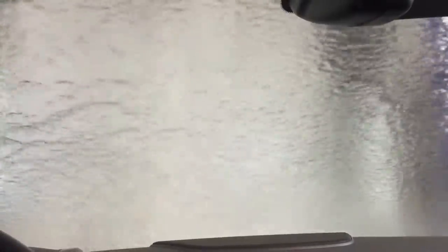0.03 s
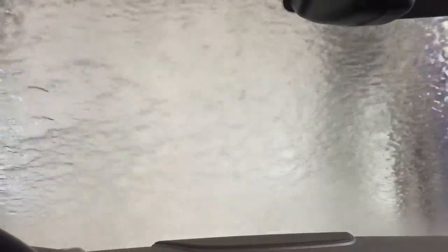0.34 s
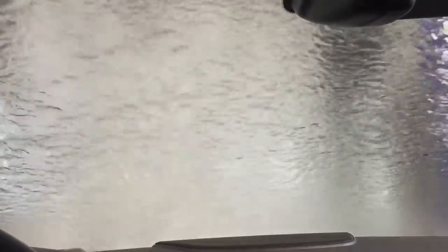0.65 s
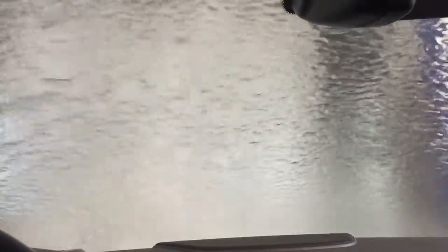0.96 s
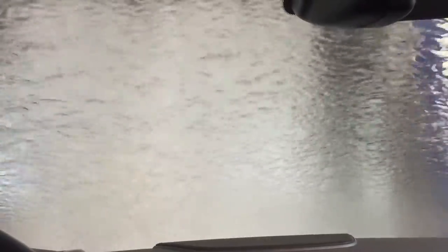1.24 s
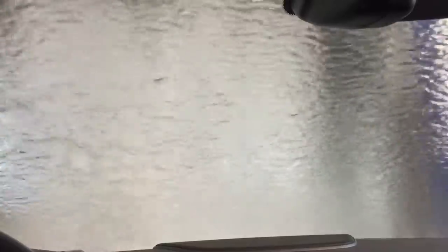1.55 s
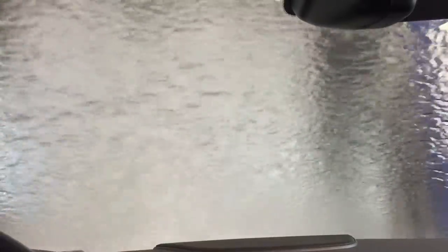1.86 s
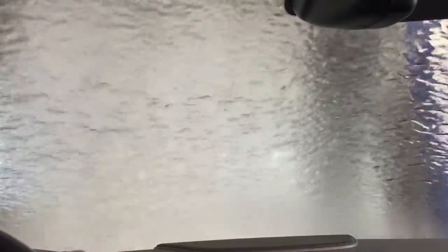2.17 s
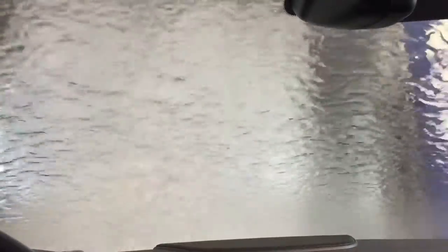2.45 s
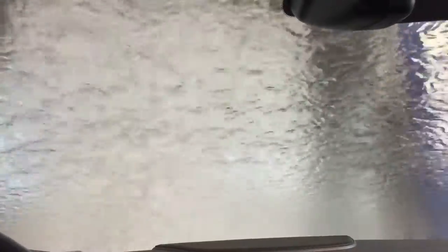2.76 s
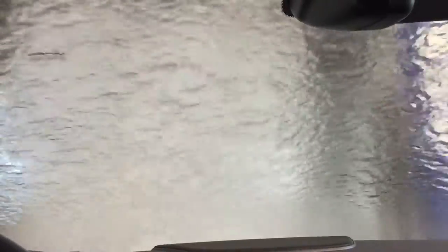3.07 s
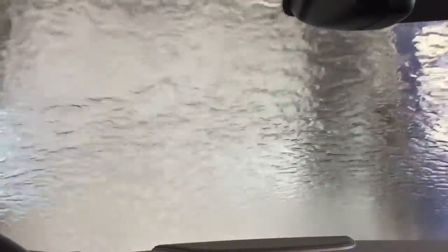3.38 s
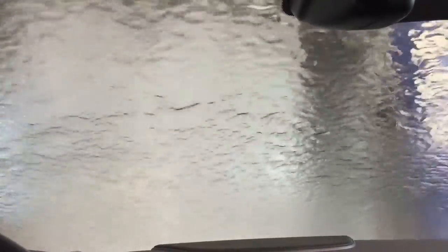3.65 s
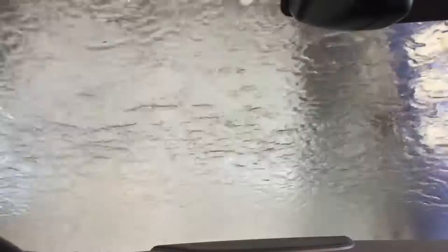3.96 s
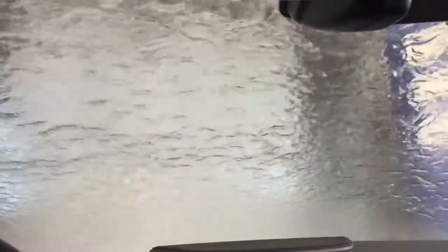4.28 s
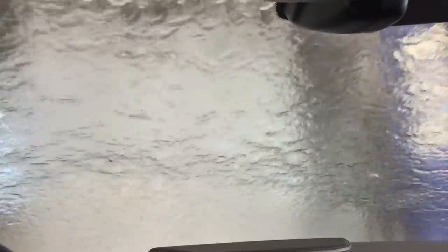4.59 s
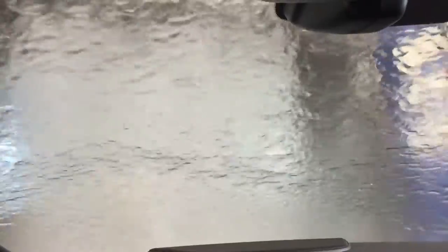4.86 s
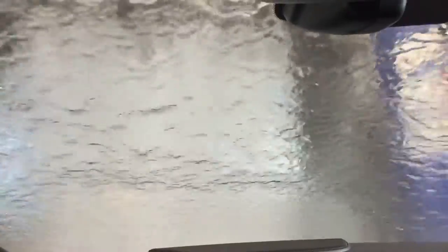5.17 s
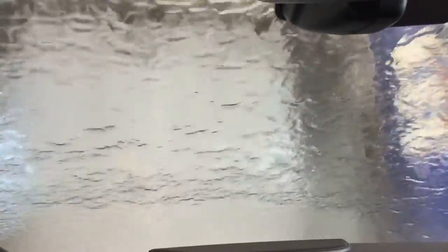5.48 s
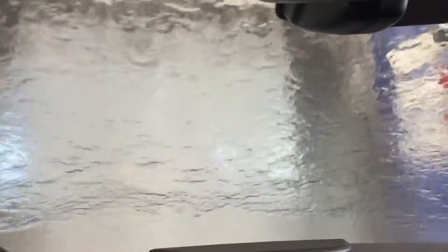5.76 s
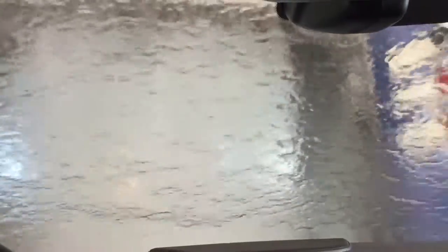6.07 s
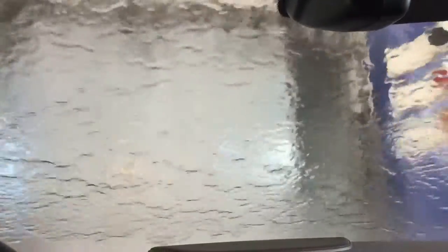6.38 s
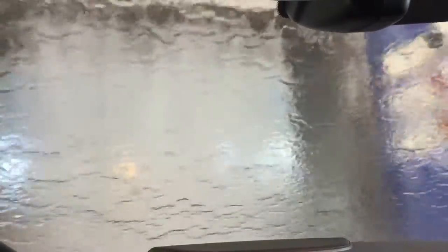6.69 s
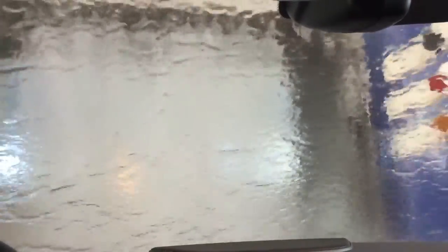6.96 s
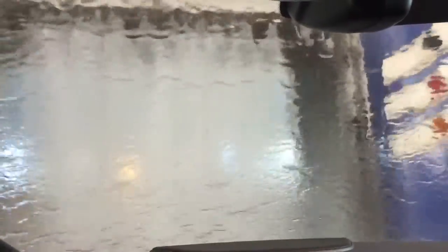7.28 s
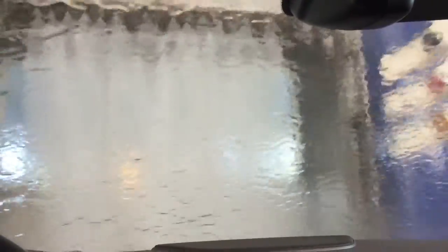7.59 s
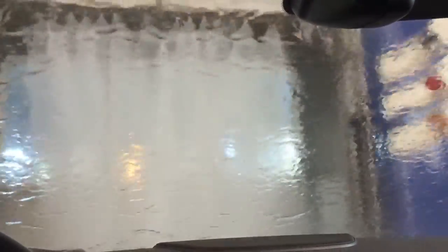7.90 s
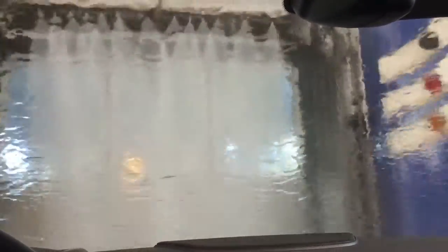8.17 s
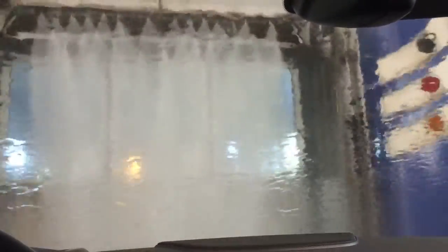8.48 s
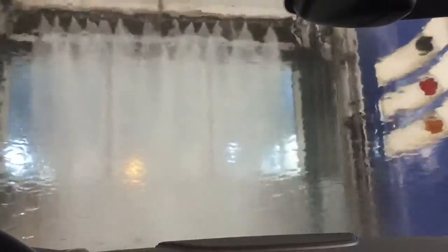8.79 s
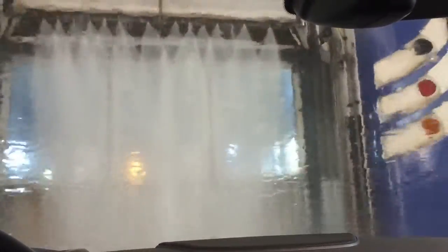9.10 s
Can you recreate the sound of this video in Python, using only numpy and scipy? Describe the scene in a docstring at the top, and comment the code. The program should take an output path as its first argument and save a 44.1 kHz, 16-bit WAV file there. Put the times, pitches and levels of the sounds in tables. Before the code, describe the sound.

Water pours over a car in an automatic wash, heard from inside the closed cabin. From the start there is a deep, continuous rumble with low drumming on the body, along with quieter gurgling, patter, small splats and a soft hiss of spray. Between about 1 and 3 seconds the water is heaviest: short gushes boom on the windscreen and little bubbles plop in the runoff. Weaker gushes come at around 3.8, 4.3 and 6.9 seconds. From about 4 seconds the water gradually eases, and by 8 seconds the windscreen boom has dropped away, leaving a softer rumble, light patter and hiss until the end just after 9 seconds. A faint, low machine hum runs underneath throughout. Two barely audible brief whines pass near 3.8 and 8.6 seconds, and one thin, high tick sounds at about 5.7 seconds.

```python
"""A curtain of water falls on a car in an automatic wash and moves off the windscreen, heard from inside.
By forced vibration the falling water makes the glass boom and the body rumble. Drops excite the
pane's bending modes, trapped bubbles resonate as plops and gurgles, and spray hisses all around.
Underneath, a slowly turning machine (a pump or the idling engine) hums at harmonics of its shaft
speed. Two faint whines and one high tick sound in passing."""
import sys
import numpy as np
from scipy import signal
from scipy.fft import rfft, irfft
from scipy.io import wavfile
from scipy.ndimage import uniform_filter1d

SR = 44100
rng = np.random.default_rng(int(sys.argv[2]) if len(sys.argv) > 2 else 0)


def store_pcm(level_fs):
    """Save levels as 16-bit WAV."""
    pcm = np.round(np.clip(level_fs, -1, 1) * 32767).astype(np.int16)
    wavfile.write(sys.argv[1], SR, np.atleast_2d(pcm).T)


N = 407484
TIME = np.arange(N) / SR
PANE_HZ, PANE_WIDTH_HZ = 110, 9  # the windscreen's drum mode
SURGE_ATTACK_S, SURGE_RELEASE_S = .04, .05
SHAFT_HZ = 14.4
CUTOFF_HZ = 15780

# weight of the stream on the windscreen, heaviest early on: (time [s], relative level [dB])
STREAM = [(0, -43.5), (0.95, -36), (1.4, -32), (2.2, -36), (3.2, -37.5), (4.6, -36.5), (5.8, -37.5),
          (7.4, -39), (8.3, -60), (9.24, -54)]
# heavy gushes that make the pane boom: (start [s], duration [s], relative level [dB])
PANE_GUSHES = [(1.145, 0.20, -27), (1.46, 0.056, -28.5), (1.631, 0.062, -23), (1.773, 0.047, -28),
               (1.975, 0.1, -33), (2.353, 0.027, -23), (2.496, 0.15, -24.5), (2.876, 0.05, -29.5),
               (3.014, 0.095, -27.5), (3.8, 0.05, -29.5), (4.33, 0.06, -33), (6.92, 0.08, -33)]
# low modes of body and cabin air: (frequency [Hz], bandwidth [Hz], relative level [dB])
RUMBLE_MODES = [(34.6, 14, -42), (47.3, 38, -22), (66.97, 5.2, 2.5), (77.4, 18, 2.5), (88.7, 23, 3.5)]
# slugs of water landing on roof and bonnet: (start [s], duration [s], level [dB])
ROOF_SLUGS = [(0.34, 0.10, -28.5), (0.88, 0.03, -30), (2.19, 0.12, -33.5), (2.76, 0.04, -31.5)]
# water landing on the car, easing as the curtain moves off: (time [s], load [dB])
WATER_LOAD = [(0, 0), (1.1, -0.5), (2.0, -2), (4.0, -3.5), (5.1, -5), (5.7, -5), (6.3, -7), (8.0, -9.5),
              (9.24, -11)]
# how each water sound follows the load: (level at full load [dB], slope [dB per dB of load])
RUMBLE_BY_LOAD = (-36, 0.72)
DRUMMING_BY_LOAD = (-39, 0.4)
GURGLE_BY_LOAD = (-55, 0.44)
PATTER_BY_LOAD = (-54.5, 1.06)
SPRAY_BY_LOAD = (-55, 0.22)
SPLAT_BY_LOAD = (-52, 0.99)
# harmonics of the machine: (order [multiple of shaft speed], relative level [dB])
SHAFT_ORDERS = [(3, -46), (5, -45.5), (6, -43.5), (8, -48.5), (10, -45.5), (11, -47.5), (15, -76),
                (21, -70), (23, -65.5), (25, -60.5), (27, -63.5)]
# response of the shell to each water sound: (frequency [Hz], relative gain [dB])
DRUMMING_RESPONSE = [(100, -4.5), (128, 1.5), (150, -3), (185, -3.5), (235, -12), (280, -8.5), (330, -15),
                     (385, -15.5), (470, -24.5), (720, -29.5), (1100, -48)]
GURGLE_RESPONSE = [(300, -7.5), (480, 0.5), (570, 5.5), (650, 2.5), (715, -6.5), (780, 0), (850, 1.5),
                   (900, -4), (975, -1), (1060, -14), (1500, -31)]
PATTER_RESPONSE = [(700, -6.5), (960, 3.5), (1080, -3), (1260, 0), (1480, 2), (1700, 0.5), (2000, -2),
                   (2300, -5), (2800, -19.5), (4500, -19)]
SPRAY_RESPONSE = [(600, -11.5), (1200, -9), (2000, -3.5), (3100, -2.5), (3450, -1), (3900, -3), (4900, -10),
                  (5700, -9.5), (7500, -16), (8800, -15.5), (10000, -19), (10450, -23.5), (10950, -20),
                  (16000, -22.5)]
# resonances of glass and panels: (frequency [Hz], bandwidth [Hz], lift [dB])
BENDING_MODES = [(432.6, 4.8, 9), (687, 23, 5), (770, 10, 1.5), (1131, 22, 5.5), (1410, 37, -2),
                 (1435, 28, 2.5), (1825, 15, 3.5), (2200, 18, 4), (2794, 12, 5.5), (3480, 95, 1),
                 (3900, 44, -5), (4350, 50, -1), (4520, 40, 4)]
# larger bubbles in the water sheet: (time [s], relative level [dB], starting pitch [Hz], length [s])
LARGE_BUBBLES = [(0.014, -44, 1810, 0.01), (0.197, -45, 1430, 0.017), (0.239, -45, 1280, 0.011),
                 (0.417, -45, 2160, 0.014), (0.973, -43, 1552, 0.025), (1.106, -38.5, 960, 0.014),
                 (1.152, -37, 1454, 0.018), (1.164, -45, 2160, 0.012), (1.275, -46, 2170, 0.02),
                 (1.277, -48.5, 2820, 0.023), (1.444, -46, 1700, 0.02), (1.611, -48, 1550, 0.024),
                 (1.730, -47, 1380, 0.026), (2.152, -44, 2300, 0.01), (2.264, -42.5, 2120, 0.009),
                 (2.782, -46, 2700, 0.012), (3.148, -44.5, 1695, 0.018)]
# faint, brief tones: (time of peak [s], peak level [dB], frequency [Hz], half length [s])
WHINE_TONES = [(3.795, -56, 755, 0.14), (8.60, -63, 808, 0.13)]


def from_db(db):
    """Amplitude ratio of a level in decibels."""
    return 10 ** (np.asarray(db) / 20)


def rms_one(x):
    """Normalisation to an rms of 1."""
    return x / np.sqrt(np.mean(x ** 2) + 1e-20)


def in_time(curve):
    """Linear interpolation of a curve to every sample."""
    return np.interp(TIME, *np.transpose(curve))


def under_load(law):
    """Power law: a sound's amplitude follows the load of water on the car."""
    full_db, slope = law
    return from_db(full_db + slope * in_time(WATER_LOAD))


def surging(gain, surges):
    """Power addition of a flow and its surges, each of which swells, holds and dies away."""
    swells = 0
    for start, length, db in surges:
        corners = [start - SURGE_ATTACK_S, start, start + length, start + length + SURGE_RELEASE_S]
        swells += from_db(db) * np.interp(TIME, corners, [0, 1, 1, 0])
    return np.sqrt(gain ** 2 + swells ** 2)


def drift(corner_hz):
    """Slow random fluctuation: low-pass noise of rms 1."""
    step, settle = 40, 2000
    r = np.exp(-2 * np.pi * corner_hz * step / SR)
    noise = rng.standard_normal(N // step + settle + 2)
    slow = signal.lfilter([1], [1, -2 * r, r * r], noise)[settle:]
    return np.interp(np.arange(N) / step, np.arange(len(slow)), rms_one(slow))


def resonate(x, hz, width_hz):
    """A damped two-pole resonator with unit gain at its peak."""
    r = np.exp(-np.pi * width_hz / SR)
    feedback = [1, -2 * r * np.cos(2 * np.pi * hz / SR), r * r]
    return signal.lfilter(np.array([1, 0, -1]) * (1 - r * r) / 2, feedback, x)


def shaken_mode(hz, width_hz, length=N, settle=SR):
    """Response of a steep-sided resonance to the random push of water; rms 1."""
    push = rng.standard_normal(length + settle)
    return rms_one(resonate(resonate(push, hz, width_hz), hz, width_hz)[settle:])


def steady(x, span_s):
    """Division by the running rms evens out slow swells and keeps the fast beating."""
    return x / np.sqrt(uniform_filter1d(x * x, size=int(span_s * SR)) + 1e-6)


def through_shell(force, response):
    """Transmission through glass and panels as a causal, minimum-phase filter; rms 1."""
    size = 8192
    hz, db = np.transpose(response)
    grid = np.maximum(np.arange(size // 2 + 1) * SR / size, 1)
    skirts = np.minimum(grid / hz[0], 1) ** 2 * np.minimum(hz[-1] / grid, 1) ** 2
    gain = from_db(np.interp(np.log(grid), np.log(hz), db)) * skirts
    cepstrum = irfft(np.log(gain))
    cepstrum[1:size // 2] *= 2  # folding onto positive time gives minimum phase
    cepstrum[size // 2 + 1:] = 0
    impulse_response = irfft(np.exp(rfft(cepstrum)))
    return rms_one(signal.fftconvolve(force, impulse_response)[:N])


def glass(force):
    """Modal superposition: the pane's bending modes ring on after each impact; rms 1."""
    ringing = sum((from_db(db) - 1) * resonate(force, hz, width) for hz, width, db in BENDING_MODES)
    return rms_one(force + ringing)


def drops(per_s, spread_db):
    """Shot noise: impacts at random moments, many small and a few large; rms 1."""
    sizes = from_db(spread_db * np.minimum(rng.exponential(1, N), 4))
    signs = rng.choice([-1, 1], N)
    return rms_one(sizes * signs * (rng.random(N) < per_s / SR))


def bubbles(pitches, per_s, cycles, spread_db):
    """Bubble resonance: each size in the running film rings at its own pitch; rms 1."""
    force = drops(per_s, spread_db)
    size_class = rng.integers(len(pitches), size=N)
    return rms_one(sum(resonate(force * (size_class == k) + 1e-18, hz, hz / cycles)
                       for k, hz in enumerate(pitches)))


def windscreen(gain_db, flutter_db):
    """Forced vibration: the fluttering stream and its gushes drive the pane's lowest mode."""
    stream = from_db(in_time(STREAM) + flutter_db * drift(7.8))
    boom = steady(shaken_mode(PANE_HZ, PANE_WIDTH_HZ), span_s=0.0546)
    return from_db(gain_db) * surging(stream, PANE_GUSHES) * boom


def body(floor_db):
    """Random excitation of body modes: the lowest rumble evenly, the higher follow load and slugs."""
    modes = [from_db(db) * shaken_mode(hz, width) for hz, width, db in RUMBLE_MODES]
    deep = steady(rms_one(sum(modes[:2])), span_s=0.39)
    upper = steady(rms_one(sum(modes[2:])), span_s=.2)
    return from_db(floor_db) * deep + surging(under_load(RUMBLE_BY_LOAD), ROOF_SLUGS) * upper


def machine(gain_db, wander, flutter_db):
    """Periodic rotation gives a harmonic series on one slightly wandering shaft speed."""
    turns = np.cumsum(SHAFT_HZ * (1 + wander * drift(1))) / SR
    hum = np.zeros(N)
    for order, db in SHAFT_ORDERS:
        amplitude = np.sqrt(2) * from_db(db + flutter_db * drift(1.9))
        hum += amplitude * np.sin(2 * np.pi * (order * turns + rng.random()))
    return from_db(gain_db) * hum


def drumming(per_s):
    """Impact excitation: falling drops drum on the shell, low in pitch."""
    return glass(through_shell(drops(per_s, spread_db=2.5), DRUMMING_RESPONSE))


def gurgle(per_s, bubble_db):
    """Larger bubbles resonate among heavy drops in the water running off the glass."""
    ringing = bubbles(np.geomspace(480, 1050, num=16), per_s=1200, cycles=12, spread_db=1.5)
    force = drops(per_s, spread_db=1.5) + from_db(bubble_db) * ringing
    return glass(through_shell(force, GURGLE_RESPONSE))


def patter(per_s, bubble_db):
    """Light impacts excite the glass while small bubbles resonate at higher pitches."""
    ringing = bubbles(np.geomspace(950, 4000, num=28), per_s=1800, cycles=16, spread_db=2.4)
    force = drops(per_s, spread_db=2.0) + from_db(bubble_db) * ringing
    return glass(through_shell(force, PATTER_RESPONSE))


def spray(per_s, mist_db, gust_db):
    """Fine droplets, mist and tiny fizzing bubbles add incoherently to a gently gusting hiss."""
    fizz = from_db(-12) * bubbles(np.geomspace(4200, 7000, num=12), per_s=130, cycles=45, spread_db=1.5)
    force = drops(per_s, spread_db=2.0) + from_db(mist_db) * rng.standard_normal(N) + fizz
    return glass(through_shell(force, SPRAY_RESPONSE)) * from_db(gust_db * drift(3.3))


def plops(gain_db, rise, splash_db, attack_s):
    """Damped oscillation: each trapped bubble rings, rising in pitch, inside a short splash."""
    out = np.zeros(N)
    t = np.arange(SR // 10) / SR
    for start, db, hz, length in LARGE_BUBBLES:
        envelope = (1 - np.exp(-t / attack_s)) * np.exp(-2 * t / length)
        pitch_hz = hz * (1 + rise * (1 - np.exp(-t / length)))
        bubble = np.sin(2 * np.pi * np.cumsum(pitch_hz) / SR)
        splash = from_db(splash_db) * shaken_mode(hz, hz / 2, len(t), settle=0)
        at = int(start * SR)
        out[at:at + len(t)] += from_db(db + gain_db) * envelope / envelope.max() * (bubble + splash)
    return out


def splats(peak_per_s, decay_s, spread_db):
    """Impact transients: lumps of water slap the pane, harder and more often under the curtain."""
    gain = under_load(SPLAT_BY_LOAD)
    chance = gain / gain.max()
    out = np.zeros(N)
    t = np.arange(SR // 20) / SR
    for when, pitch, softness, draw in rng.random((int(peak_per_s * N / SR), 4)):
        at = int(when * (N - len(t)))
        hz = 900 * 4 ** pitch  # spread over two octaves
        if draw < chance[at]:
            splash = shaken_mode(hz, hz / 2, len(t), settle=0) * np.exp(-t / decay_s)
            out[at:at + len(t)] += splash * gain[at] * from_db(-spread_db * softness)
    return out


def cabin(x, wet_db, t60):
    """Reverberation: close, quickly damped reflections from windows, roof and seats."""
    t = np.arange(SR // 8) / SR
    echoes = rng.standard_normal(len(t)) * from_db(-60 * t / t60) * (t > .002)
    reflected = signal.fftconvolve(x, echoes / np.linalg.norm(echoes))[:N]
    wet = from_db(wet_db)
    return (x + wet * reflected) / np.sqrt(1 + wet ** 2)


def whines():
    """Pure tones swell and fade under Gaussian envelopes."""
    return sum(from_db(db) * np.exp(-((TIME - peak_s) / half_s) ** 2) * np.sin(2 * np.pi * hz * TIME)
               for peak_s, db, hz, half_s in WHINE_TONES)


def tick(at_s, level_db, t60):
    """Exponential decay of very high noise: one thin tick close by in the cabin."""
    age = TIME - at_s
    fizz = through_shell(rng.standard_normal(N), [(6000, -9), (9500, -6), (11500, 0), (15500, 0)])
    return fizz * (age > 0) * from_db(level_db - 60 * np.abs(age) / t60)


def suppressor(x, depth, memory, size):
    """Spectral expansion: mid bands dip and rise further about their averages, so the hiss clumps."""
    framing = dict(fs=SR, nperseg=size, noverlap=size * 3 // 4)
    hz, _, frames = signal.stft(x, **framing)
    power = np.abs(frames) ** 2 + 1e-20
    recent = signal.lfilter([1 - memory], [1, -memory], power, axis=1, zi=memory * power[:, 2:3])[0]
    average = uniform_filter1d(power, size=200, axis=1)
    excess = np.minimum(recent / average, 3)
    reach = np.interp(hz, [250, 1000, 6500, 8000], [0, 1, 1, 0])[:, None]
    return signal.istft(frames * excess ** (depth * reach), **framing)[1][:N]


def scene():
    """Superposition of water, hum, whines and tick at one point in the cabin."""
    water = under_load(DRUMMING_BY_LOAD) * drumming(per_s=1200)
    water += under_load(GURGLE_BY_LOAD) * gurgle(per_s=4000, bubble_db=-4.5)
    water += under_load(PATTER_BY_LOAD) * patter(per_s=5000, bubble_db=-12.0)
    water += under_load(SPRAY_BY_LOAD) * spray(per_s=7000, mist_db=2.0, gust_db=0.25)
    rumble = windscreen(gain_db=-0.5, flutter_db=2.5) + body(floor_db=-48.5)
    hum = machine(gain_db=-2.1, wander=0.00307, flutter_db=2.5)
    gulps = plops(gain_db=-3.8, rise=.06, splash_db=-3.5, attack_s=.0012)
    slaps = splats(peak_per_s=32, decay_s=.006, spread_db=18)
    splashes = cabin(gulps + slaps, wet_db=-10, t60=.06)
    high_tick = tick(at_s=5.689, level_db=-53, t60=.085)
    return (rumble + hum + water + splashes + whines() + high_tick)[None]


def record(dry):
    """Band limiting: the microphone loses deep bass, a mild noise suppressor acts, the top is cut."""
    high_pass = signal.butter(2, 24, "high", fs=SR, output="sos")
    low_pass = signal.ellip(12, .1, 80, CUTOFF_HZ, fs=SR, output="sos")
    thinned = signal.sosfilt(high_pass, dry[0])
    clumpy = suppressor(thinned, depth=.31, memory=.6, size=1024)
    return signal.sosfilt(low_pass, clumpy)[None]


dry = scene()
out = record(dry)
store_pcm(out)
```